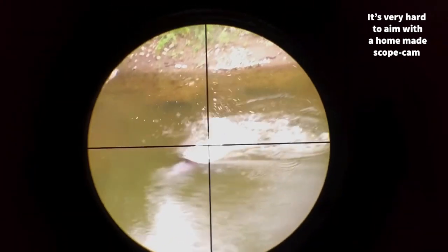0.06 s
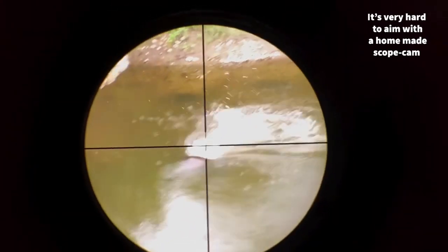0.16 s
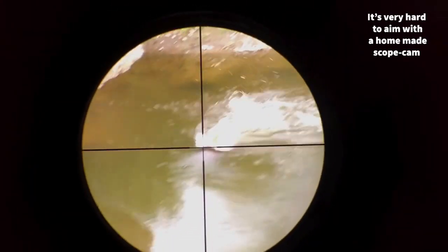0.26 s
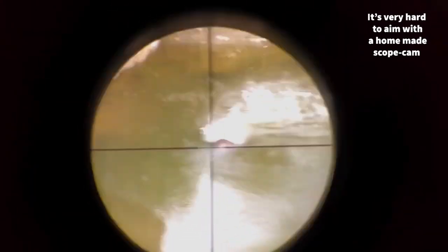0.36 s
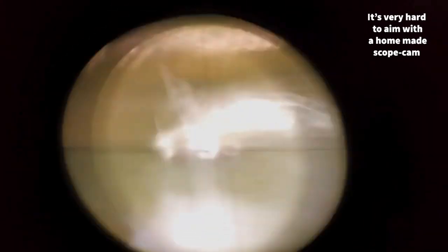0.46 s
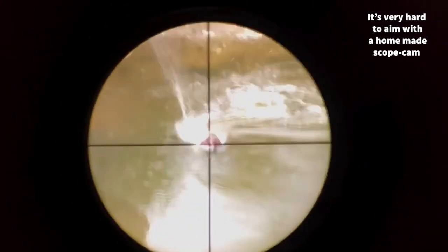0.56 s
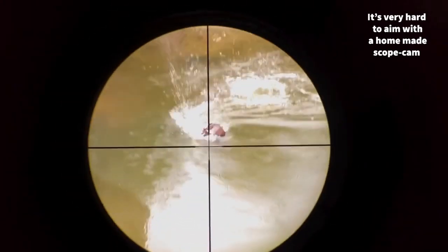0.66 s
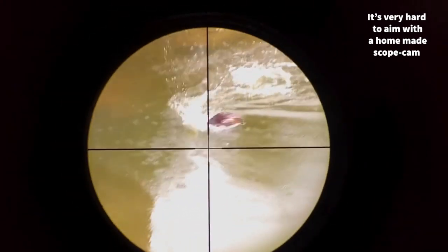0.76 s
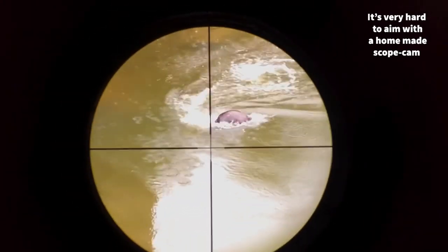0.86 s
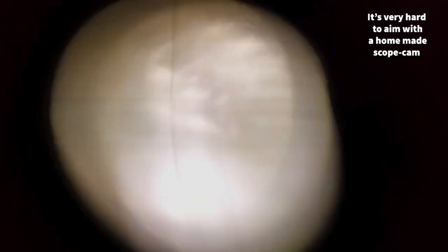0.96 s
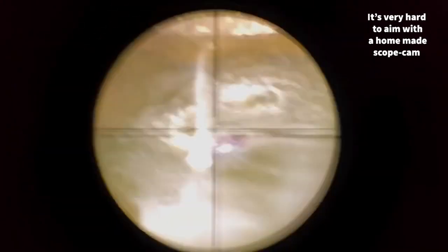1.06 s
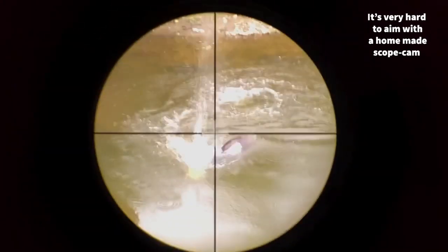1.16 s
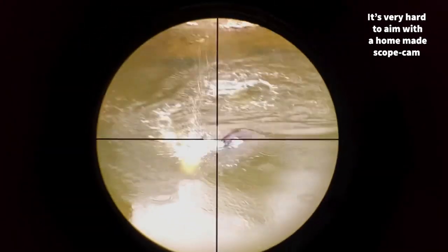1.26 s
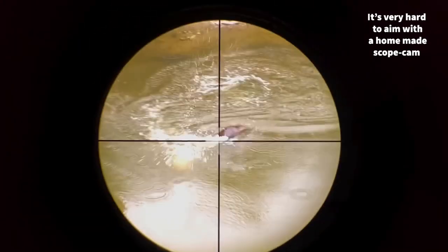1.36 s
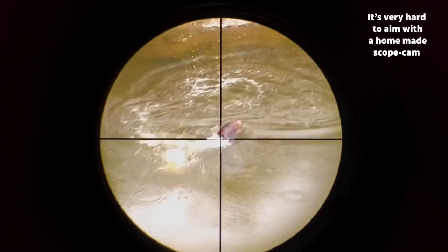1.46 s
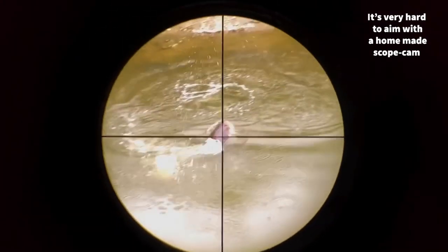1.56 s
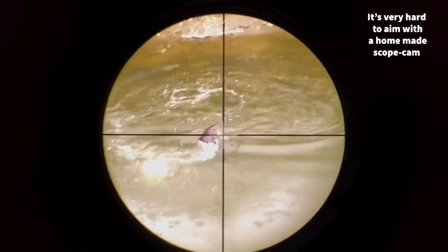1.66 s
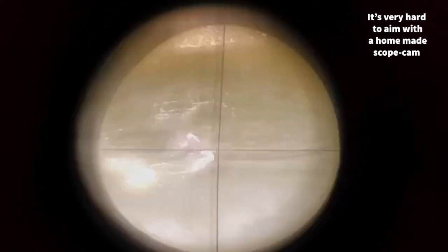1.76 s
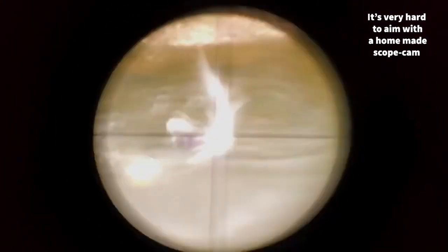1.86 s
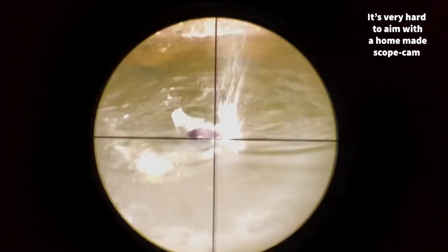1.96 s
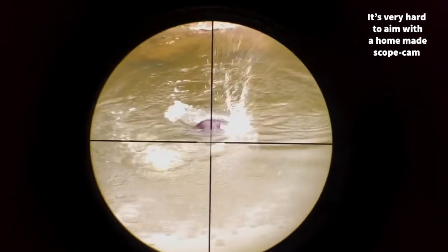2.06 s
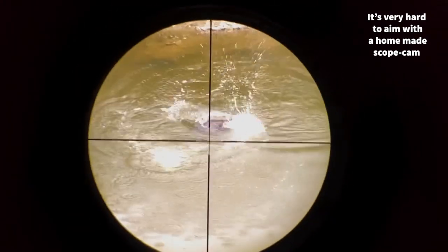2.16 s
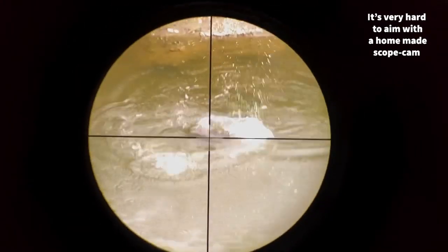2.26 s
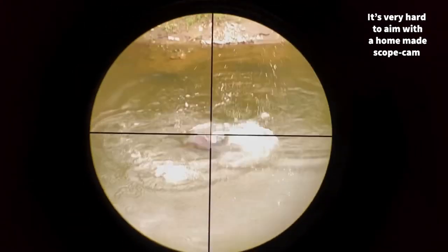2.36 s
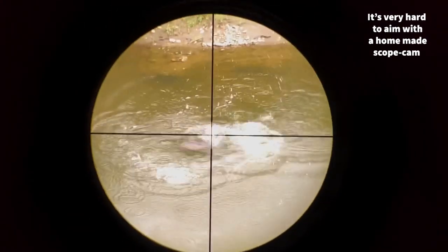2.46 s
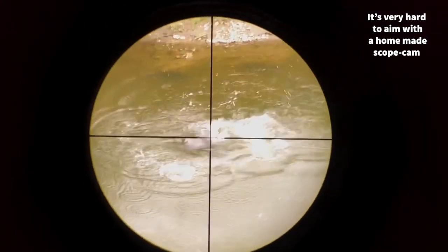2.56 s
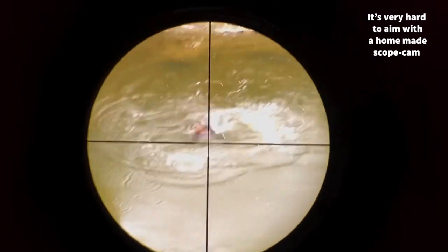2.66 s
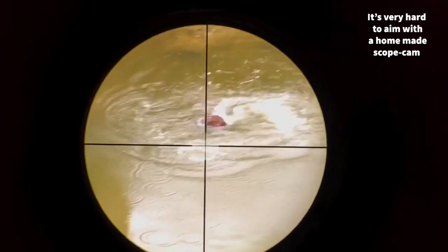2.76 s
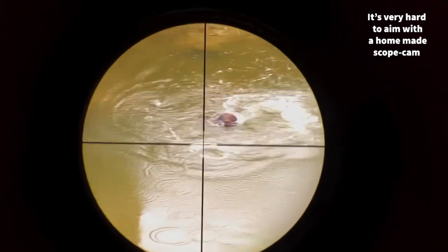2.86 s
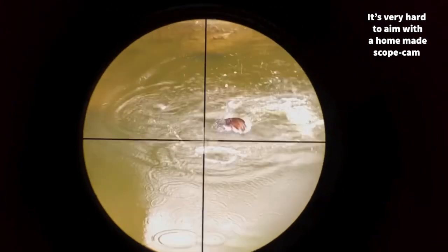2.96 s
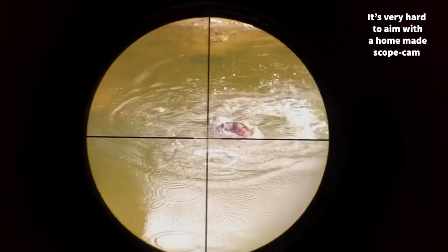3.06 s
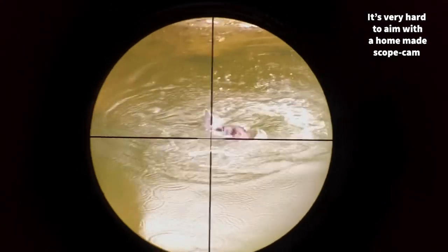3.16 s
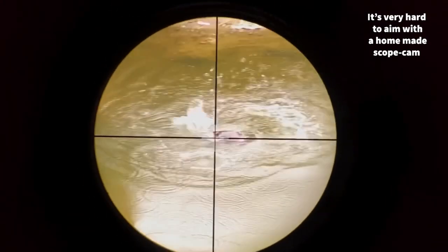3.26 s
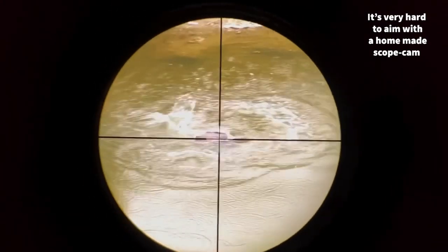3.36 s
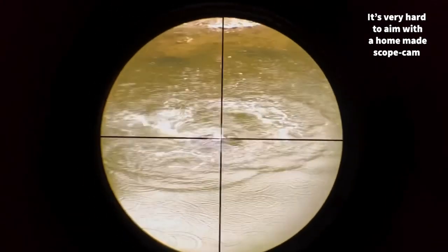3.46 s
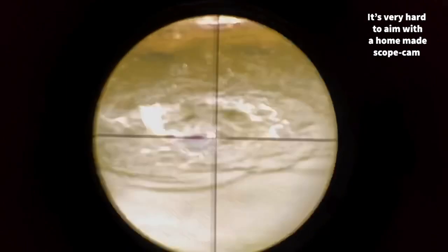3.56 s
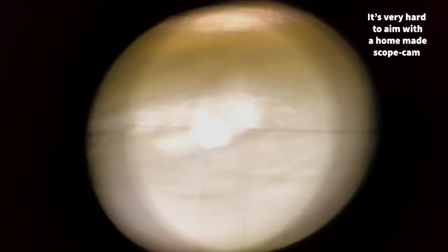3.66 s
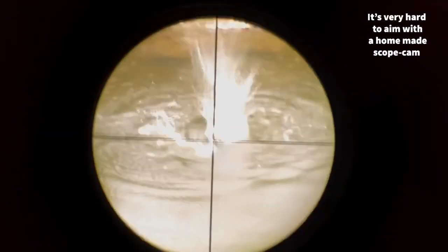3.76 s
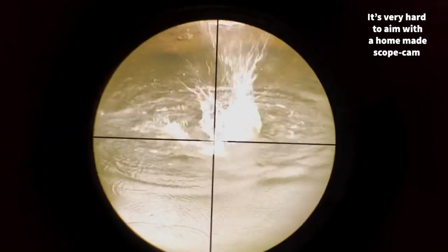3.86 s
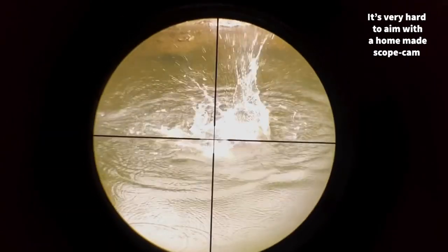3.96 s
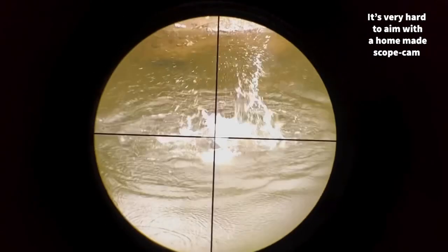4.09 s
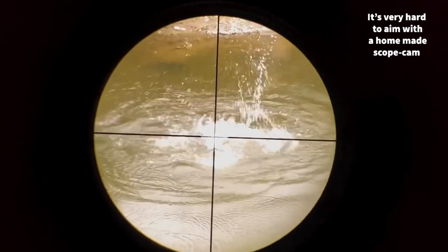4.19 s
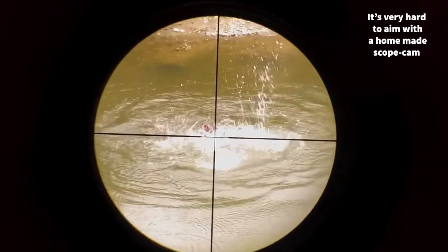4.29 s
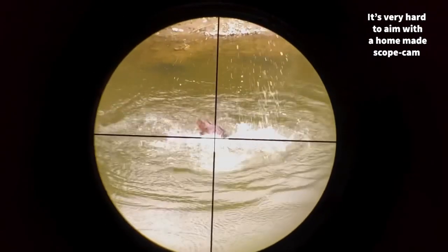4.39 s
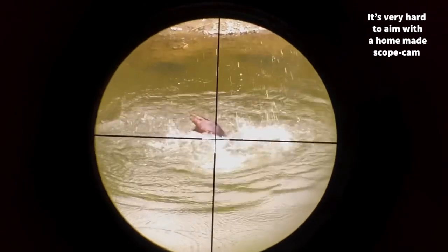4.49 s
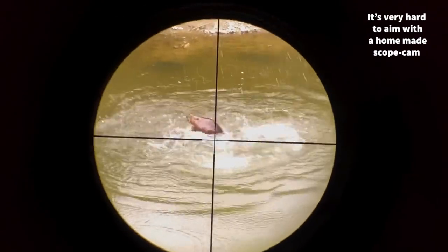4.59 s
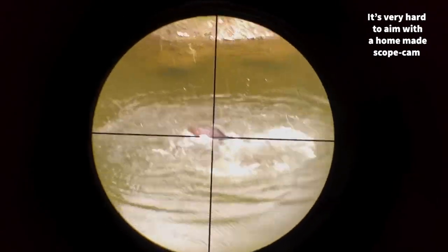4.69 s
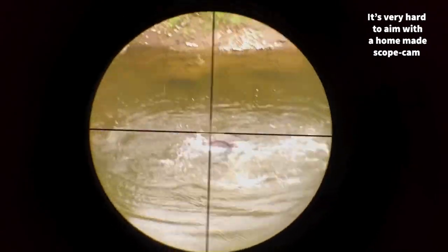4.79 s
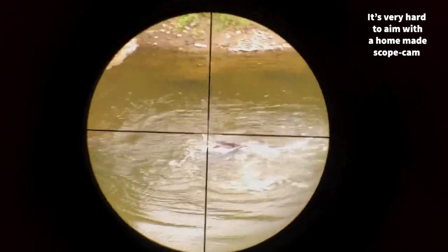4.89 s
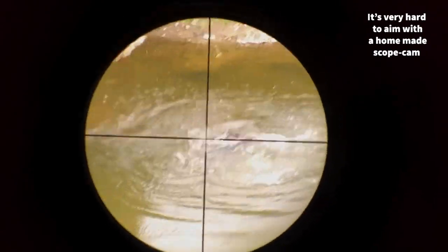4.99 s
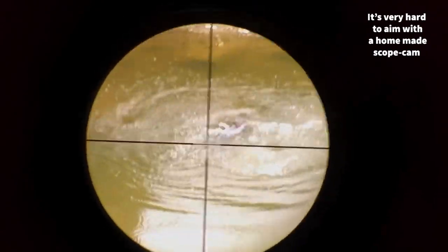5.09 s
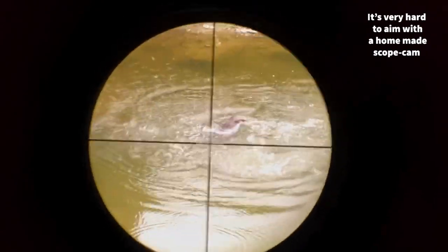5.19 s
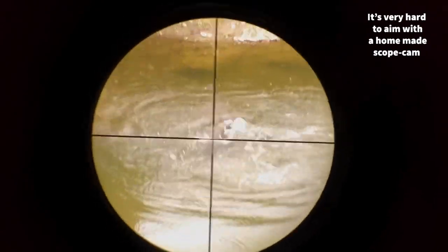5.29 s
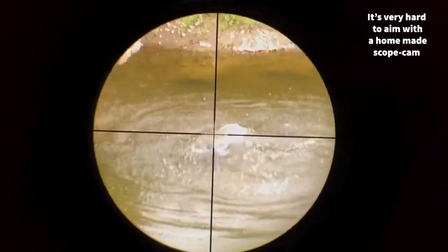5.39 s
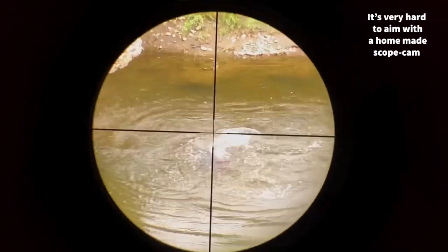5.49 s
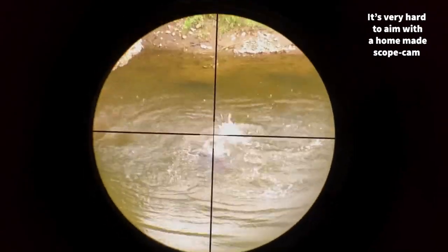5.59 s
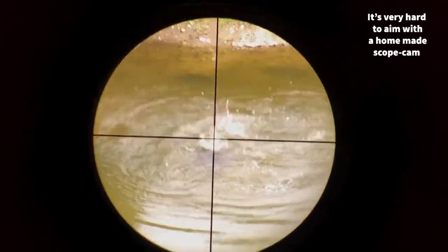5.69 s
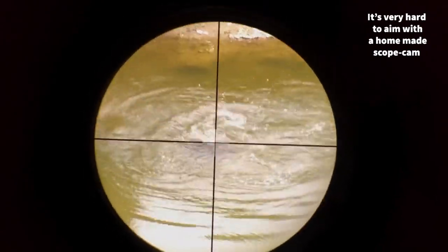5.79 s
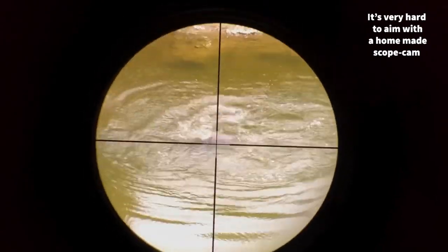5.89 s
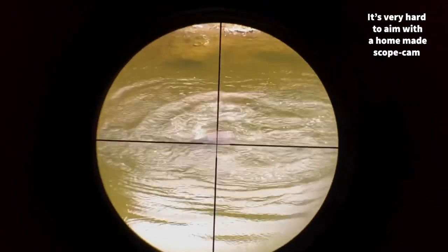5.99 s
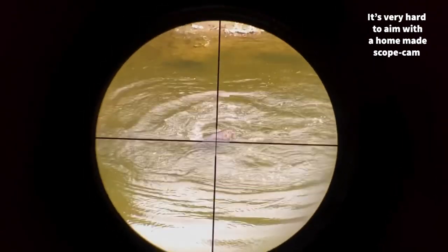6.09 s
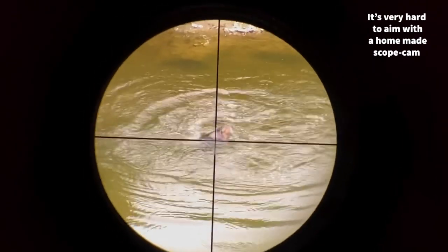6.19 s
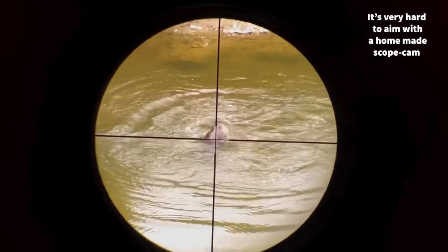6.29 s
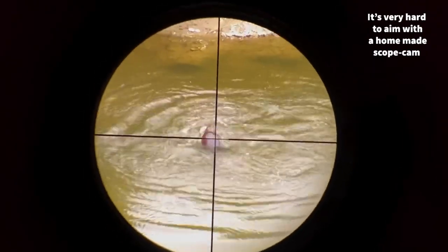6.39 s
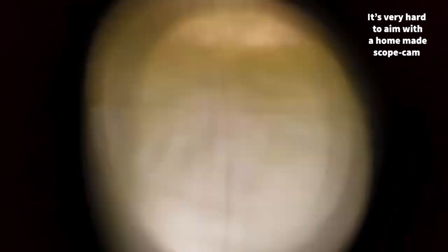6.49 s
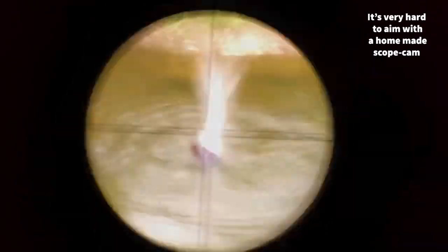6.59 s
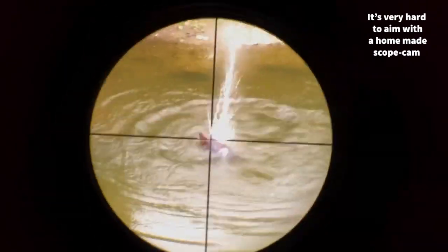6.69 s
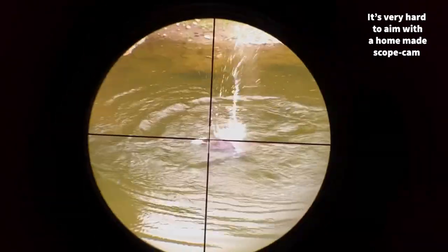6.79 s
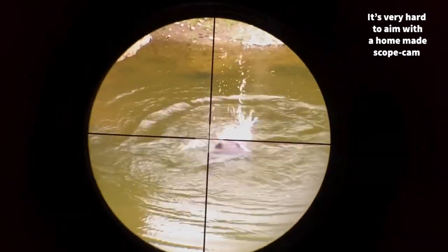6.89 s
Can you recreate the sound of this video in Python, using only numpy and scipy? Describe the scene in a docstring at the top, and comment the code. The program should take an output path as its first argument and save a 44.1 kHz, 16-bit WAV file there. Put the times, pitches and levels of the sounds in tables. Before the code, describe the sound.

A small self-loading rifle fires five times at a pond: three shots in quick succession, a fourth after a pause and the last after a longer wait. The microphone sits in a tube on the gun, so each shot is a hard, clacking knock of trigger and bolt. A brief splash and hollow echo return just afterwards. Faint rustling lies underneath, and wind rumbles before the final shot.

```python
"""Rifle shots at a pond

A small self-loading rifle fires five times, heard from a microphone in a tube clamped behind the sight.
Impacts of trigger, hammer and bolt travel through the mount; report and splash return from water and
bank a moment later. The tube's resonances colour these returns, a far rustle and a faint hiss.
Wind rumbles on the microphone, and the loudest knocks overload it."""
import sys
import numpy as np
from scipy import signal
from scipy.fft import rfft, irfft
from scipy.io import wavfile

SR = 44100
rng = np.random.default_rng(int(sys.argv[2]) if len(sys.argv) > 2 else 0)


def dump(signal):
    """Clip the signal to [-1, 1] and save it as 16-bit WAV at the path in sys.argv[1]."""
    limited = np.clip(np.atleast_2d(signal).T, -1, 1)
    pcm = np.round(limited * 32767).astype(np.int16)
    wavfile.write(sys.argv[1], SR, pcm)


N = 306054

# trigger, linkage and hands on the gun: time_s, snap_db, clack_db, thump_db
KNOCKS = [(0.237, -80, -59, -34.5), (0.3537, -35.5, -17.5, -13.5), (0.3672, -41.5, -43.5, -21.5),
          (0.3768, -51.5, -25.5, -29.5), (0.3865, -41, -31.5, -26), (0.854, -45, -28.5, -16),
          (0.8623, -57.5, -29, -19.5), (0.9436, -45, -27, -41), (0.9489, -48.5, -43.5, -28.5),
          (1.7251, -51, -26.5, -18.5), (1.7332, -49.5, -21.5, -23), (1.7425, -59.5, -41, -21),
          (1.7568, -46, -29, -30), (1.767, -44, -39, -35), (3.331, -63.5, -64, -50),
          (3.53, -71, -43, -32.5), (3.5659, -33, -14.5, -10.5), (3.5705, -52, -25, -9),
          (3.5777, -40, -16, -24), (3.583, -43, -51, -17), (3.59, -47, -34, -17.5),
          (3.597, -36.5, -26.5, -24), (5.53, -74, -60, -33), (5.54, -81, -71, -35),
          (5.546, -80, -71, -24.5), (5.573, -71, -66, -31), (5.684, -78, -28.5, -24.5),
          (5.744, -43, -18, -14.5), (6.4596, -30, -12, -5.5), (6.4765, -39, -19, -23),
          (6.4863, -28, -25, -8)]
# firing cycles: time_s, firing_db, back_delay_s, back_db, shut_delay_s, shut_db, shut_ring_db
SHOTS = [(0.3907, 1, .026, 3, .0428, 2, -11), (0.961, -0.5, 0.026, 1.5, 0.045, 0.5, -7.5),
         (1.7776, -1.5, 0.026, 1.5, 0.044, 0.5, -12.5), (3.6012, -1, .0267, 1, .0448, -0.5, -12.5),
         (6.4987, 1, 0.024, -1, .0416, -8, -22)]
# the bolt is driven off the breech: delay_s, snap_db, ring_db, clack_db, thump_db
FIRING = [(0, -14, -9.5, -8.5, -5), (.006, -26, -31.5, -10.5, -9), (.011, -36, -31.5, -31, -3.5)]
BOLT_BACK_DB, BOUNCE_DB = (-25.5, -18, -24, -5.5), (-54, -38.5, -32.5, -54.5)   # snap, ring, clack, thump
BOLT_SHUT_DB = (-27.5, -13.5, -5)   # snap, clack, thump


def impacts():
    """Blowback: amid the handling knocks, each shot throws the bolt back; it shuts and bounces once."""
    rows = [(s, snap, snap - 8, clack, thump) for s, snap, clack, thump in KNOCKS]   # ring: 8 dB lower
    for s, firing_db, back_s, back_db, shut_s, shut_db, ring_db in SHOTS:
        rows += [(s + delay, *(firing_db + np.array(levels))) for delay, *levels in FIRING]
        rows += [(s + back_s, *(back_db + np.array(BOLT_BACK_DB)))]
        snap, clack, thump = shut_db + np.array(BOLT_SHUT_DB)
        rows += [(s + shut_s, snap, ring_db, clack, thump)]
        rows += [(s + shut_s + 0.003, *(shut_db + np.array(BOUNCE_DB)))]
    return rows


# modes of the bolt, receiver, stock and whole recoiling gun: pitch_hz, level_db, t60_s
BOLT_MODES = [(3930, -18.5, .012), (4964, -2, 0.011), (5370, 11.5, 0.0071), (10980, -5.5, 0.02)]
RECEIVER_MODES = [(943, 5, .02), (1142, 6.5, 0.012), (1400, 1, .01), (1802, 4, 0.024), (2400, -24.5, .008)]
STOCK_MODES = [(395, -29, 0.35), (515, 9.5, 0.034), (578, -23.5, 0.35), (802, 0.5, 0.011)]
RECOIL_MODES = [(119, -13.5, 0.026), (195.2, -3.5, 0.043), (266.7, -2, 0.047), (322, 9.5, 0.02)]


def rifle_action():
    """Impact excitation: each blow gives a gritty snap, rings bolt and receiver and thumps the stock."""
    times, snap_db, ring_db, clack_db, thump_db = np.transpose(impacts())
    grit = rms_one(tube(band(rng.standard_normal(N), 3000, 25000), bass_db=-9.5))
    blows = clicks(times, from_db(snap_db))
    snap = grit * (dying(blows, 0.019) + from_db(-24) * dying(blows, 0.091))
    ring = struck(times, ring_db, BOLT_MODES, 4800, 16000, stages=1)
    clack = struck(times, clack_db, RECEIVER_MODES, 470, 2200, stages=9)
    thump = struck(times, thump_db, STOCK_MODES, 337, 850, stages=8)
    recoil_db = 2.7 * thump_db + 0.5   # only hard blows move the whole gun
    recoil = struck(times, recoil_db, RECOIL_MODES, 90, 690, stages=12)
    return snap + ring + clack + thump + recoil


def struck(times, peak_db, modes, low_hz, high_hz, stages):
    """Modal superposition: contacts of limited hardness ring damped modes, differently on every blow."""
    out, unit_blow = np.zeros(N), np.zeros(SR // 20)
    spreads_db = rng.normal(0, 2.9, (len(times), len(modes))).T
    for (hz, level_db, t60), spread_db in zip(modes, spreads_db):
        radius, angle = from_db(-60 / (t60 * SR)), 2 * np.pi * hz / SR
        mode = [0, from_db(level_db) * np.sin(angle)], [1, -2 * radius * np.cos(angle), radius ** 2]
        out += signal.lfilter(*mode, clicks(times, from_db(peak_db + spread_db)) + 1e-18)
        unit_blow += signal.lfilter(*mode, signal.unit_impulse(len(unit_blow)))
    out, unit_blow = (bending(band(x, low_hz, high_hz), stages) for x in (out, unit_blow))
    return out / np.abs(unit_blow).max()


def bending(x, stages, pole=.86):
    """Dispersion: bending waves in barrel and mount bring the treble first, and the bass trails."""
    return signal.sosfilt([[-pole, 1, 0, 1, -pole, 0]] * stages, x + 1e-18)


# returns of each shot: slap_delay_s, slap_db, echo_delay_s, first_db, second_db, bright_db, swell_db
POND = [(.1503, -30.5, .169, -1.5, -4, -0.5, -3), (.157, -28, .170, -4, -5.5, -0.5, -3.5),
        (.1412, -33.5, .1622, 0, -1, 1, 2), (.1501, -28, .1621, -0.5, 0, 1, 7.5),
        (0.1552, -30, 0.1593, 0.5, 1, 5, 10)]
# two groups of echoes off water and bank: extra_delay_s, middle_db, bass_db, treble_db
FIRST_ECHOES = [(0, -31.5, -15, -37.5), (.005, -24.5, -22, -50)]
SECOND_ECHOES = [(.029, -26, -16.5, -40), (0.05, -34.5, -21, -45.5), (.088, -39, -31.5, -52),
                 (.14, -46, -44, -65.5)]
# two soft late returns: time_s, middle_db, bass_db, treble_db
LATE_ECHOES = [(3.993, -46.5, -35.5, -60.5), (4.04, -51, -38.5, -70)]
SPLASH_DB, SWELL_DB = (-4, 10, -18.5), (-55, -37.5, -57)   # middle, bass, treble


def pond_returns():
    """Propagation delay: a faint swell, then the slap and splash on the water and the report's echoes."""
    shot_s = np.transpose(SHOTS)[0]
    slap_delays, slap_levels = np.transpose(POND)[:2]
    slap_envelope = dying(clicks(shot_s + slap_delays, from_db(slap_levels)), 0.061)
    slaps = band(rng.standard_normal(N) * slap_envelope, 7050, 12000)
    echoes, swells, fronts = list(LATE_ECHOES), [], []
    for s, (slap_s, slap_db, echo_s, first_db, second_db, bright_db, swell_db) in zip(shot_s, POND):
        tilt_db = bright_db * np.array([.5, -.5, 1])   # middle, bass, treble
        echoes += [(s + slap_s, *(slap_db + tilt_db + SPLASH_DB))]
        for db, table in ((first_db, FIRST_ECHOES), (second_db, SECOND_ECHOES)):
            group = [(s + echo_s + delay, *(db + tilt_db + levels)) for delay, *levels in table]
            echoes += group
            fronts += [group[0]]   # the leading echo keeps the report's sharp front
        swells += [(s + .078, *(swell_db + np.array(SWELL_DB)))]
    front_s, middle_db, bass_db, _ = np.transpose(fronts)
    crack = band(clicks(front_s, from_db(middle_db + 22.5)), 1400, 4800)
    thud = band(clicks(front_s + .004, from_db(bass_db + 39.5)), 152, 520)
    diffuse = scattered(echoes, rise_cycles=1.2, dull_db_per_octave=3.5)
    swell = scattered(swells, rise_cycles=11, dull_db_per_octave=1.5)
    return slaps + crack + thud + diffuse + swell


# decay of a return by band: low_hz, high_hz, level_db, early_t60_s, tail_db, tail_t60_s
BASS_DECAY = [(127, 870, 5.5, 0.052, -28, 0.92)]
MIDDLE_DECAY = [(851, 2210, 7.9, 0.056, -22.5, 1.17), (2182, 2815, 3, 0.07, -20, 1.1)]
TREBLE_DECAY = [(2900, 4740, 8.8, 0.069, -20.5, .8), (4535, 7300, 2.3, 0.049, -11.5, 0.55),
                (7670, 11000, 2.3, 0.13, -14, 0.5), (11900, 15000, 2, 0.058, -7.5, 0.23)]


def scattered(rows, rise_cycles, dull_db_per_octave):
    """Incoherent scattering by water and trees: bursts add in power, fall fast and leave a long tail."""
    times, middle_db, bass_db, treble_db = np.transpose(rows)
    out = np.zeros(N)
    for bands, db in ((BASS_DECAY, bass_db), (MIDDLE_DECAY, middle_db), (TREBLE_DECAY, treble_db)):
        for low, high, level_db, early_t60, tail_db, tail_t60 in bands:
            loss_db = dull_db_per_octave * np.log2(max(low / 2900, 1))
            power = clicks(times, from_db(2 * (db + level_db - loss_db)))
            power = dying(power, early_t60 / 2) + from_db(2 * tail_db) * dying(power, tail_t60 / 2)
            rise = np.clip(min(low, 1500) / SR / rise_cycles, 0, 1)   # the bass builds up most slowly
            power = signal.lfilter([rise], [1, rise - 1], power)
            noise = rms_one(band(rng.standard_normal(N), low, high))
            out += band(np.sqrt(power) * noise, low, high)
    return out


# air modes of the tube around the microphone: pitch_hz, width_hz, level_db
TUBE_MODES = [(497.7, 98, 5), (1828, 378, 6), (3590, 325, 4.5), (5330, 720, -1.5), (7035, 920, -6),
              (8850, 2600, -23), (10740, 1700, -8.5), (15900, 1200, -18.5)]


def tube(x, bass_db):
    """Air-column resonance: parallel modes cancel between neighbours; the deepest bass leaks past."""
    out = from_db(bass_db) * band(x, 74, 520)
    for hz, width, level_db in TUBE_MODES:
        radius = np.exp(-np.pi * width / SR)
        gain = (1 - radius ** 2) / 2
        feedback = [1, -2 * radius * np.cos(2 * np.pi * hz / SR), radius ** 2]
        out += from_db(level_db) * signal.lfilter([gain, 0, -gain], feedback, x)
    return out


# spectrum of the wind: frequency_hz, density_db
WIND_SPECTRUM = [(20, -20.5), (45, -3.5), (100, -3.5), (160, -5), (250, -10.5), (450, -14), (800, -39)]
# gusts: time_s, level_db
GUSTS = [(0, -71), (0.29, -57.5), (1.5, -63), (2.3, -64), (3.1, -60), (3.47, -51.5), (4.2, -66),
         (4.5, -57.5), (4.65, -58), (4.8, -57.5), (4.95, -63), (5.3, -55), (5.63, -58), (5.97, -45),
         (6.18, -43), (6.34, -27), (6.41, -36.5), (6.6, -40), (6.7, -50), (6.94, -79)]


def wind():
    """Turbulence: gusts press on the microphone as a wavering rumble."""
    gust_db, = in_time(GUSTS)
    return from_db(gust_db + 1.7 * drift(6.4)) * coloured(WIND_SPECTRUM)


# spectra of the rustle's two parts: frequency_hz, density_db
RUSTLE_LOW = [(100, -6.5), (300, 1), (500, -0.5), (800, -4.5), (1000, -13.5)]
RUSTLE_HIGH = [(800, -11), (1000, 0.5), (1800, -9), (2500, -14.5), (3600, -28), (4400, -23), (5300, -35.5),
               (9000, -46)]
# their envelopes: time_s, low_db, high_db
RUSTLE_LEVELS = [(0, -50, -50), (0.25, -52.5, -55), (0.78, -44.5, -51.5), (1.45, -51.5, -54),
                 (1.62, -54.5, -58.5), (2.3, -48, -52), (2.6, -59, -58.5), (2.76, -51.5, -60),
                 (3.05, -47, -54.5), (3.35, -48.5, -60), (4.2, -53.5, -53), (4.42, -55, -60),
                 (4.8, -46, -54.5), (5.1, -48.5, -57.5), (5.4, -51, -62), (5.65, -45.5, -60.5),
                 (6.0, -48, -61.5), (6.34, -46.5, -58.5), (6.6, -51, -58), (6.94, -50, -56)]


def far_rustle():
    """Amplitude modulation: two bands of noise flicker independently, heard through the tube."""
    low_db, high_db = in_time(RUSTLE_LEVELS)
    low = from_db(low_db + 0.43 * drift(8.3)) * rms_one(tube(coloured(RUSTLE_LOW), bass_db=-20.5))
    high = from_db(high_db + 0.61 * drift(9.2)) * rms_one(tube(coloured(RUSTLE_HIGH), bass_db=-18))
    return low + high


# spectrum of the hiss outside the tube: frequency_hz, density_db
HISS_SPECTRUM = [(2200, 5.5), (3600, 1), (5300, -4), (9000, -6.5), (13000, -5), (15200, -2), (15900, -28.5)]
# its envelope in the 8-15 kHz band: time_s, level_db
HISS_LEVEL = [(0, -99), (0.9, -100.5), (1.5, -96), (2.5, -104), (3.05, -88), (3.45, -82.5), (4.3, -99),
              (5.0, -88.5), (5.6, -81), (6.35, -73.5), (6.6, -69.5), (6.72, -91), (6.94, -101)]


def faint_hiss():
    """Resonant filtering: the tube colours a high noise that swells and fades."""
    level_db, = in_time(HISS_LEVEL)
    hiss = tube(coloured(HISS_SPECTRUM), bass_db=-17)
    return from_db(level_db) * hiss / np.std(band(hiss, 8000, 15000))


def from_db(db):
    """Amplitude ratio of a level in dB."""
    return 10 ** (np.asarray(db) / 20)


def rms_one(x):
    """Normalisation to unit power."""
    return x / np.sqrt(np.mean(x ** 2) + 1e-20)


def band(x, low_hz, high_hz):
    """Maximally flat band-pass filtering."""
    sections = signal.butter(2, [low_hz, min(high_hz, .45 * SR)], "band", fs=SR, output="sos")
    return signal.sosfilt(sections, x + 1e-18)


def clicks(times, sizes):
    """Impulse train: one sample per event."""
    out = np.zeros(N)
    np.add.at(out, np.round(np.asarray(times) * SR).astype(int), sizes)
    return out


def dying(x, t60):
    """Exponential decay: each impulse falls 60 dB in t60 seconds."""
    return signal.lfilter([1], [1, -from_db(-60 / (t60 * SR))], x + 1e-18)


def drift(rate_hz):
    """Low-passed noise: a slow random fluctuation of unit power."""
    pole = np.exp(-2 * np.pi * rate_hz / SR)
    return rms_one(signal.lfilter([1], [1, -2 * pole, pole ** 2], rng.standard_normal(N + SR))[SR:])


def coloured(spectrum):
    """Spectral shaping of white noise, at unit power."""
    hz = np.maximum(np.fft.rfftfreq(N, 1 / SR), 1)
    points_hz, points_db = np.transpose(spectrum)
    gain = from_db(np.interp(np.log(hz), np.log(points_hz), points_db, left=-99, right=-99))
    return rms_one(irfft(rfft(rng.standard_normal(N)) * gain, N))


def in_time(rows):
    """Linear interpolation of each level column, one value a sample."""
    times, *columns = np.transpose(rows)
    return [np.interp(np.arange(N) / SR, times, column) for column in columns]


def scene():
    """Superposition: distant sound enters through the tube; gun and wind act on the microphone directly."""
    background = far_rustle() + wind() + faint_hiss()
    return (rifle_action() + tube(pond_returns(), bass_db=-14) + background)[None]


OVERLOAD_AMPLITUDE, CUTOFF_HZ = .71, 16970


def record(dry):
    """Saturation: the input stage adds faint noise and flattens the peaks; a low-pass cuts the top."""
    noisy = dry + from_db(-87.5) * rms_one(band(rng.standard_normal(N), 5000, 14500))
    saturated = noisy / (1 + np.abs(noisy / OVERLOAD_AMPLITUDE) ** 3) ** (1 / 3)
    return signal.sosfilt(signal.cheby2(12, 70, CUTOFF_HZ, fs=SR, output="sos"), saturated)


dry = scene()
out = record(dry)
dump(out)
```